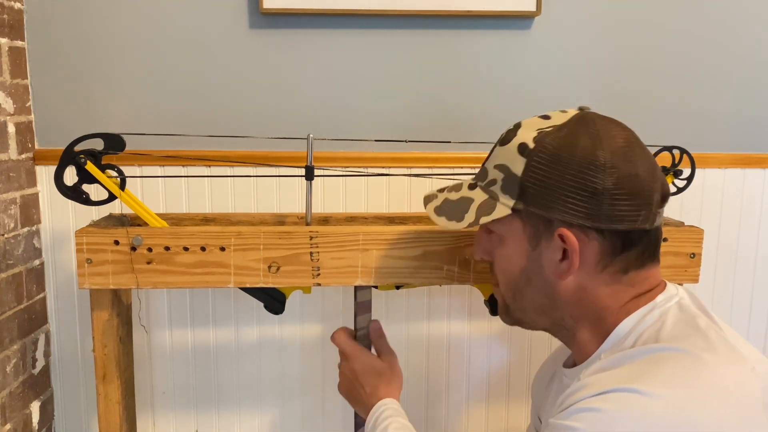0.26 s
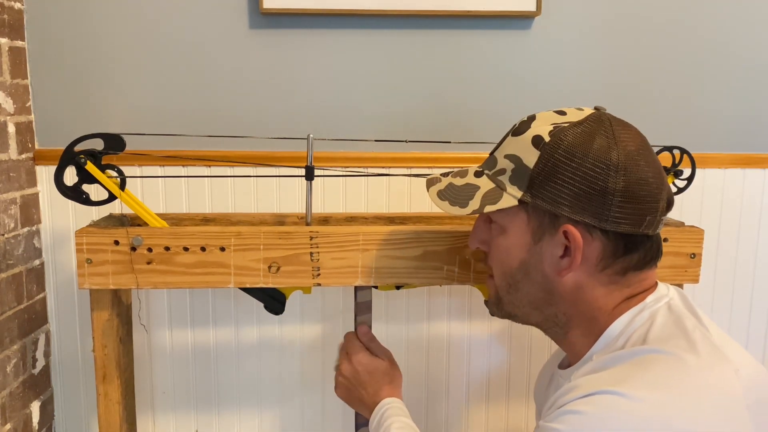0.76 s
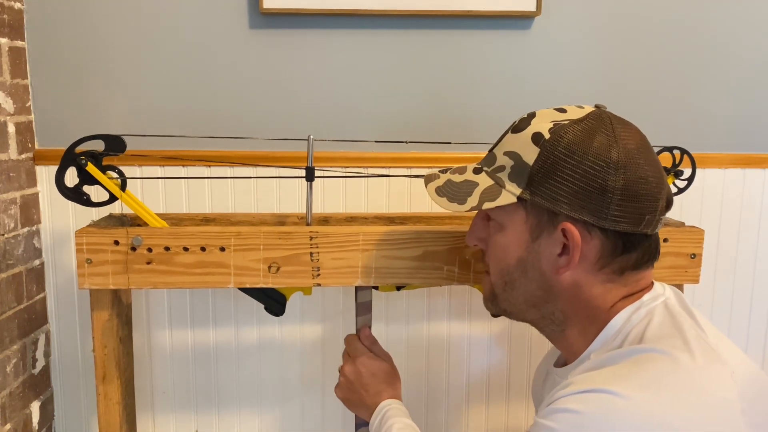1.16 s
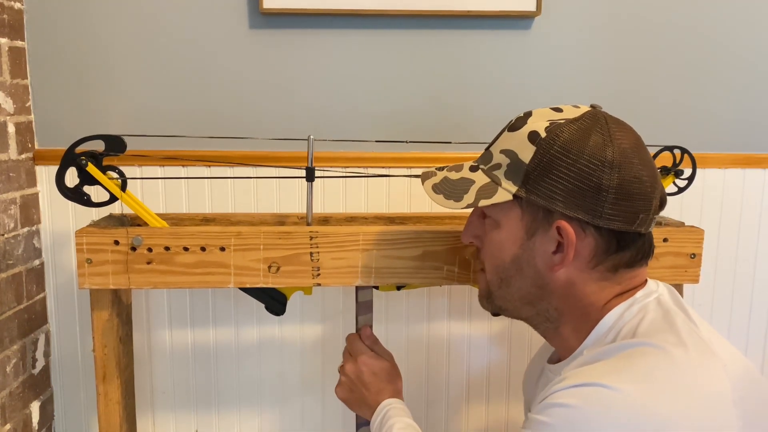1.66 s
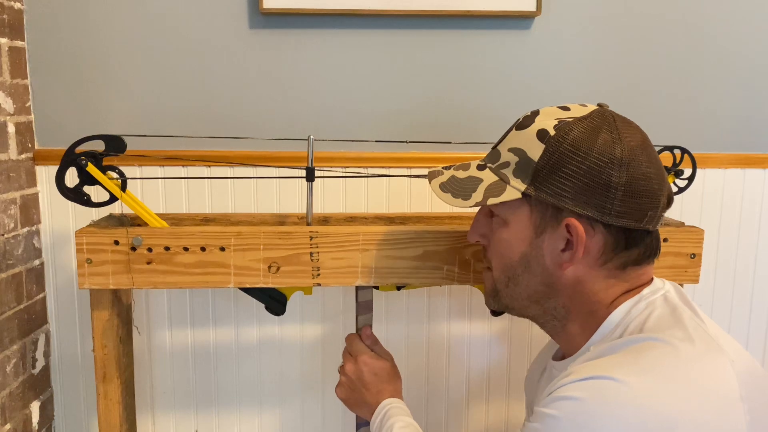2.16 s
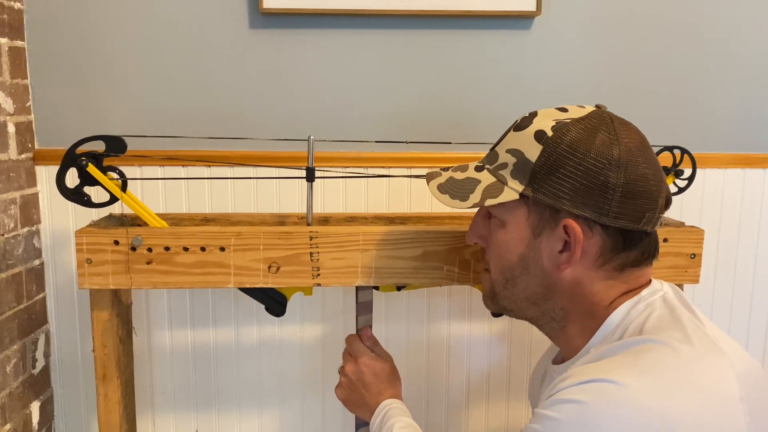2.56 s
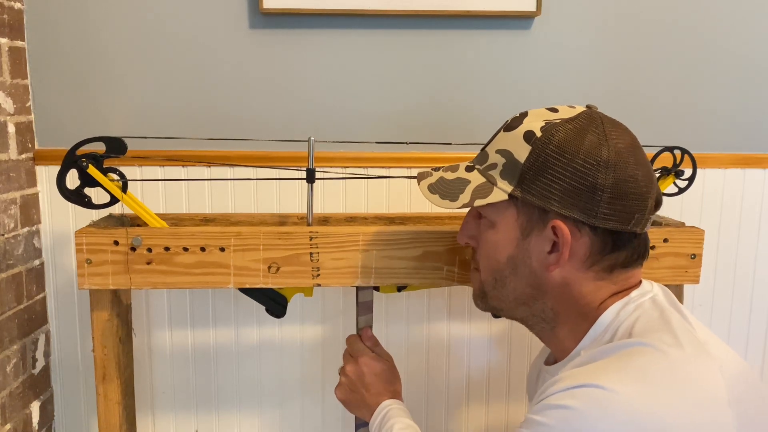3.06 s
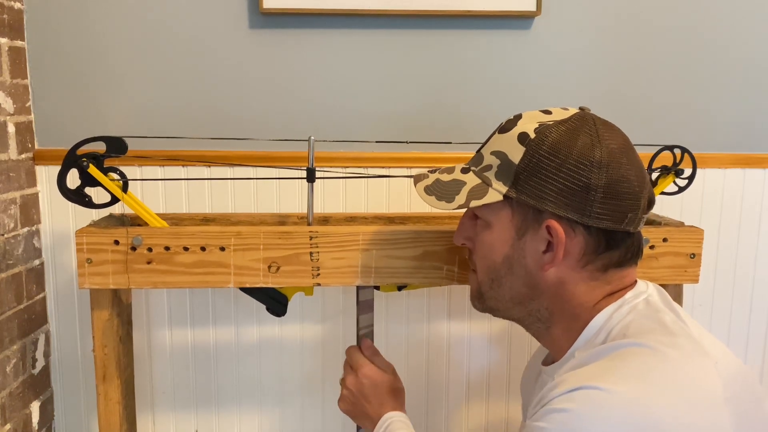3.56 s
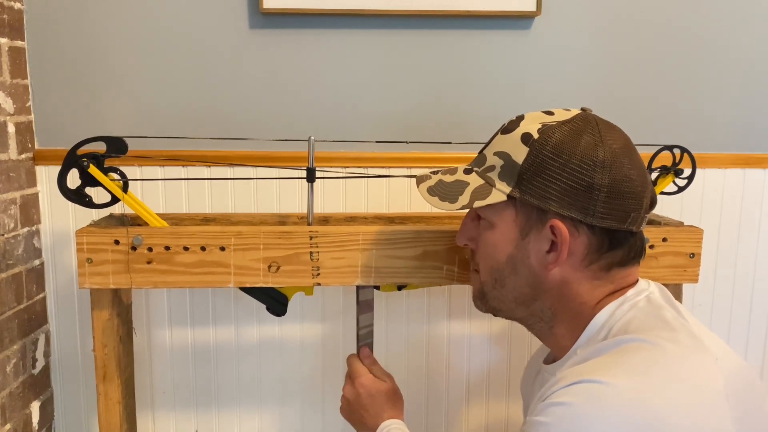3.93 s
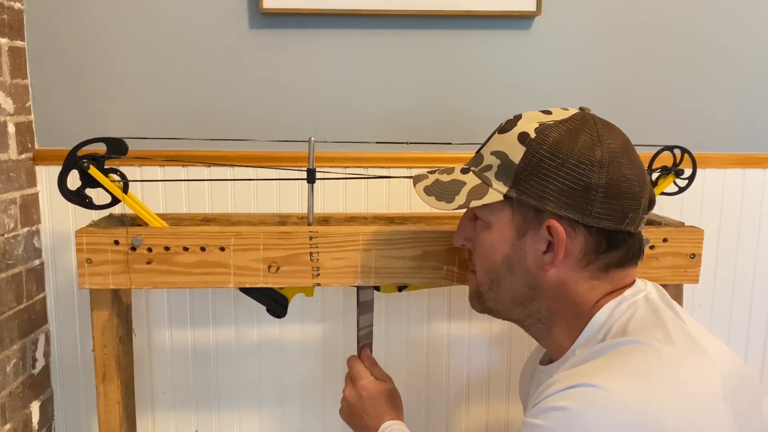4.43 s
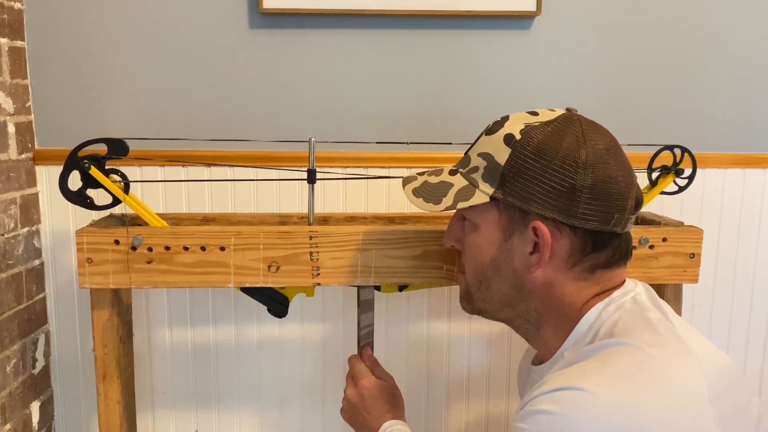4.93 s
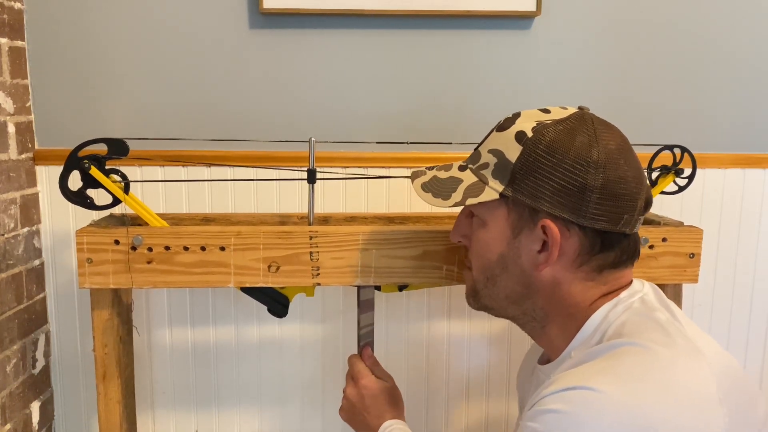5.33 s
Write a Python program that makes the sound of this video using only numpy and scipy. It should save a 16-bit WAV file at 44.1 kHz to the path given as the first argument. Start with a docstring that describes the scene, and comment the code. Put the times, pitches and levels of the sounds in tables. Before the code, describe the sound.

A ratchet strap is slowly tightened under a wooden bench in a bare room. After a soft rustle and a few faint ticks, the steel catch snaps out sharp clicks in uneven bunches. Between them the axle gives brief high squeaks, and the loaded wood groans and knocks dully. The stereo microphone hears it near the centre, with a short echo and a faint low rumble.

```python
"""Tightening a ratchet strap

A strap is cranked tight under a wooden bench in a bare room. The pawl, a small steel catch, snaps over
the teeth and knocks the beam. The axle sticks and slips, which makes it squeak. The loaded wood groans
and thuds, and the strap rustles and twangs. A two-channel microphone hears it all over a low rumble."""
import sys
import numpy as np
from scipy import signal
from scipy.fft import rfft, irfft, next_fast_len
from scipy.io import wavfile
from scipy.ndimage import map_coordinates

SR = 44100
rng = np.random.default_rng(int(sys.argv[2]) if len(sys.argv) > 2 else 0)


def generate_wav(sig):
    """Save sig (samples, or channels by samples) to the path in sys.argv[1] as 16-bit PCM at SR."""
    pcm = np.round(np.clip(np.atleast_2d(sig).T, -1, 1) * 32767).astype(np.int16)
    wavfile.write(sys.argv[1], SR, pcm)


N = 246519

# Pawl and handle hits (time [s], level [dB], extra beam [dB], extra handle [dB], extra treble [dB],
# rattle length [ms])
HITS = [(0.1264, -63, 8, 8.5, -5, 6.6), (0.4274, -43.5, -11, -9, -9.5, 6.2),
        (0.5752, -65, -14, 1.5, -13, 3.2), (0.8485, -55, -4, -1, -4, 4.1),
        (0.8751, -36, 2.5, -4.5, -14, 3.5), (0.9594, -57, 9, 3, -16, 7.4), (1.005, -67.5, 22, -3, -9, 3.96),
        (1.172, -23.5, -12, -5.5, -8.5, 4.4), (1.1804, -27.5, -6.5, -0.5, -9, 3.9),
        (1.3884, -26.5, -13, -15.5, -5, 5.5), (1.5406, -36.5, -8, -6, -13, 4.06),
        (1.8524, -54, -1.5, 6, -8, 2.6), (1.937, -9, -24, -14, -3.5, 2.66),
        (2.1294, -44.5, -3, -6, -11, 4.1), (2.368, -59, 0, -6, -12.5, 3.5),
        (2.7927, -50, -6.5, -3.5, -19, 3.4), (2.8718, -21, -13, -7, -11, 7.5),
        (3.2025, -32.5, -32.5, -24.5, -8.5, 14), (3.2201, -34, -10.5, -11, -13, 5.4),
        (3.4773, -55.5, 11.5, 0, -3.5, 5.5), (3.628, -51.5, 9, -3, -16, 10),
        (3.665, -9.5, -16.5, -16, -5.5, 3.4), (3.8359, -32, -16, -11, -11.5, 3.5),
        (3.8732, -37, -9.5, -15.5, -17.5, 4.4), (3.9073, -48.5, 1.5, -2.5, -1, 5.5),
        (4.2194, -48.5, -6, -11, -22, 5.1), (4.4597, -62, 6, 3.5, -9.5, 3.6),
        (4.6099, -27.5, -10, -11, -2, 4.1), (4.6201, -21.5, -11.5, 0, -11.5, 7.9),
        (4.923, -34.5, -11.5, -8, -4, 5.3), (4.97, -41.5, -2, -5, -7.5, 4.2),
        (5.1498, -56, 14, 0.5, -11, 5.6), (5.1902, -14, -14, -10.5, -7.5, 4.3),
        (5.3958, -39.5, -6.5, -8.5, -16, 4.4)]
# The pawl climbing a tooth just before it drops (time [s], level [dB], rattle length [ms])
CLIMBS = [(1.381, -29, 7.3), (1.93, -40, 7.5), (3.647, -36, 8.6), (3.6629, -29, 1.2), (5.1852, -35.5, 4.6)]
# A climb hardly moves the wood (extra beam [dB], extra handle [dB], extra treble [dB])
CLIMB_EXTRAS = (-27, -8, -8.5)
# The notes each part rings at (pitch [Hz], width [Hz], level [dB])
PAWL_NOTES = [(4870, 1290, -2.5), (6430, 1400, -2), (8180, 940, -3.5)]
PAWL_HIGH_NOTES = [(10420, 1000, 5.5), (11830, 750, 5), (14540, 2200, 2.5)]
HANDLE_NOTES = [(2189, 1200, -2.5), (3960, 1600, 2)]
FRAME_NOTES = [(758, 235, -5.5), (1153, 230, -2), (1430, 274, -6.5)]
BEAM_NOTES = [(124, 19, 2), (242, 63.4, -1.5), (356.7, 49.5, 2.5), (519, 130, -7)]
# How a hit shakes those five, in that order (boost [dB], length [times the rattle length])
PART_SHAKES = [(14.4, 1.2), (22.15, 1.8), (17.5, 1.2), (15.7, 2.5), (24.52, 4.5)]
# How much of the extra levels the ratchet's frame takes on (beam [share], handle [share])
FRAME_FOLLOWS = (0.58, .35)

# Below, a rise or fall is the time the level takes to change by 20 dB.
# Axle squeaks (time [s], level [dB], pitch [Hz], overtones [dB], rise [s], fall [s])
AXLE_SQUEAKS = [(0.432, -50.5, 7860, -10, .012, .02), (1.391, -39, 6630, 4, .009, .018),
                (1.755, -61.5, 5090, -26, .06, 0.039), (1.775, -36.5, 4950, -25.5, .008, 0.023),
                (1.785, -27, 4767, -22, .015, 0.0095), (1.815, -38, 4777, -21, .03, 0.039),
                (1.837, -40, 4805, -22.5, .03, .025), (3.212, -31.5, 6996, -8, 0.0075, 0.013),
                (3.226, -43.5, 6760, -18.5, .02, 0.04), (4.917, -34.5, 5130, -36, 0.0065, .02),
                (4.926, -20, 5104, -31, 0.011, 0.0097)]
# A squeak's overtones (pitch [times the main pitch], level [dB])
SQUEAK_OVERTONES = [(2, 4), (3, -2)]
# Groans of the loaded wood (time [s], level [dB], rise [s], fall [s], pitch [Hz])
WOOD_GROANS = [(0.44, -43, .1, 0.064, 150.4), (1.59, -46, .03, 0.065, 144.4),
               (1.66, -44.5, .2, 0.063, 145.5), (1.75, -40, .03, 0.019, 147.4),
               (2.09, -51.5, .02, 0.048, 150.2), (2.137, -47.5, .025, 0.099, 198.8),
               (3.435, -50.5, .04, 0.044, 189.9), (3.53, -32, .06, .03, 190.9), (3.565, -46, .05, .06, 185),
               (3.66, -37.5, .05, 0.019, 137.5), (3.806, -45.5, .15, 0.055, 169.2),
               (3.862, -44.5, .05, .1, 196.8), (4.944, -39.5, .03, .04, 166.8), (5.011, -39, .04, .15, 188),
               (5.199, -32, .085, 0.029, 210.4), (5.32, -47, .03, 0.037, 166.6),
               (5.38, -45.5, .05, 0.14, 198.2)]
# Dull knocks of the bench (time [s], level [dB], pitch [Hz], time to fade by 60 dB [s])
BENCH_KNOCKS = [(0.882, -42, 349, 0.25), (1, -34, 167, 0.12), (1.18, -25, 219, 0.075),
                (1.402, -31, 393, 0.054), (1.548, -27, 147, 0.12), (1.754, -29, 156.3, 0.21),
                (1.842, -33.5, 160, 0.17), (1.945, -31.5, 356, 0.23), (2.227, -22.5, 142, 0.092),
                (3.669, -19, 407, 0.1), (3.71, -28, 219.6, 0.134), (4.247, -30, 92.4, 0.08),
                (4.63, -32, 131.5, 0.15), (5.207, -24, 220, 0.2), (5.377, -33.5, 229, 0.13)]
# Rubs of strap and sleeve (time [s], hiss level [dB], rise [s], fall [s], scrape above hiss [dB])
STRAP_RUBS = [(0.0, -69, .1, 0.62, 10), (0.25, -81.5, .3, 0.44, 23), (0.418, -51.5, .045, 0.022, 0),
              (0.6, -80.5, .2, 0.31, 15.5), (0.763, -60.5, .06, 0.082, 5), (0.9, -64, .02, 0.024, 14.5),
              (0.974, -61, .025, 0.054, -2), (1.6, -72.5, .02, 0.096, 3.5), (1.76, -69.5, .03, 0.4, 3.5),
              (1.852, -55.5, .01, .04, -5), (3.302, -67, .02, 0.058, 6.5), (3.383, -73.5, .1, .3, 2.5),
              (3.508, -67, .12, .1, 10), (3.96, -78, .03, 0.12, -17.5), (4.259, -82, .03, 0.18, 9),
              (4.464, -75, .04, 0.096, 19), (5.002, -62.5, .02, .05, 8.5), (5.17, -59.5, .08, 0.017, 8),
              (5.435, -67.5, .02, 0.072, -14)]
# The path of the strap's twang (time [s], pitch [Hz], level [dB])
TWANG_PATH = [(1.2, 1093, -38.5), (1.236, 1073, -45), (1.25, 1153, -62), (1.29, 1171, -52),
              (1.3, 1177, -55), (1.404, 1181, -58.5), (1.42, 1190, -72)]
# The bench shaking the floor (time [s], level [dB], rise [s], fall [s])
FLOOR_SHAKES = [(1.46, -44.5, 0.042, 0.15), (1.62, -44, 0.12, .1), (1.8, -46, 0.097, 0.56),
                (2.19, -51.5, .09, 0.13), (3.47, -45.5, 0.075, .5), (3.71, -38.5, 0.13, 0.22),
                (4.66, -51, 0.13, 0.15), (5.04, -42, 0.14, .4), (5.45, -49.5, 0.12, 0.17),
                (1.2, -53, .6, 0.25)]
# The tone colour of each noise (frequency [Hz], relative level [dB])
HISS_COLOUR = [(1200, -52.5), (2200, -10), (4500, 4.5), (7500, -3.5), (11000, -3), (16000, -63.5)]
SCRAPE_COLOUR = [(150, -1), (350, -1.5), (800, -3), (1200, -12.5), (1750, -5.5), (2600, -18), (5000, -33.5)]
RUMBLE_COLOUR = [(50, -40.5), (90, -5), (240, -3), (500, -13.5), (1000, -21), (2000, -35.5), (4000, -41),
                 (8000, -53), (12000, -65.5)]
DRONE_COLOUR = [(20, -40.5), (40, -30.5), (52, 8.5), (61, 12.5), (72, 3), (95, 7.5), (140, -49)]

# How long the room echoes (frequency [Hz], time to fade by 60 dB [s])
ECHO_TIMES = [(100, 0.41), (400, 0.41), (1500, 0.47), (4000, 0.34), (8000, 0.31), (15000, 0.2)]
# How alike the room sounds on the left and right (frequency [Hz], likeness [0 to 1])
LIKENESS = [(60, .98), (250, .7), (700, .1), (2000, .3), (5000, .2), (6500, .55), (7500, .98), (16000, .98)]
# How far the left channel runs ahead of the right (frequency [Hz], phase [radians])
LEFT_LEAD = [(20, 0), (1200, .7), (2800, .5), (6100, .5), (7150, 0), (9000, -np.pi), (11300, -2 * np.pi),
             (13250, -3 * np.pi), (15500, -4 * np.pi)]
# How much louder the left channel is (frequency [Hz], level [dB])
LEFT_BOOST = [(60, .4), (380, -.5), (950, 1.8), (2400, 1.8), (5500, 3), (7500, .3), (15000, 0)]


def ratchet_clicks():
    """Each hit is a short rattle that rings steel and wood. Gives the direct and the wall-bound sound."""
    blow_db, spread_db = -5, -11  # the walls get each hit both as one blow and as a rattle
    t = np.arange(SR // 8) / SR
    parts = [PAWL_NOTES, PAWL_HIGH_NOTES, HANDLE_NOTES, FRAME_NOTES, BEAM_NOTES]
    forces = np.zeros((2, len(parts), N + len(t)))
    direct, to_walls = forces
    boost_db, stretch = np.transpose(PART_SHAKES)[..., None]
    climbs = [(s, db, *CLIMB_EXTRAS, ms) for s, db, ms in CLIMBS]
    for s, db, beam_db, handle_db, treble_db, ms in list(HITS) + climbs:
        start = round(s * SR)
        length_s = ms / 1000 * stretch
        shape = np.exp(-(t / length_s) ** 2) * (1 - np.exp(-t / (0.34 * length_s)))
        rattle = rng.standard_normal(shape.shape) * shape
        rattle /= np.linalg.norm(rattle, axis=1, keepdims=True)
        frame_db = np.dot(FRAME_FOLLOWS, [beam_db, handle_db])
        gains = amp(db + boost_db + np.vstack([0, treble_db, handle_db, frame_db, beam_db]))
        direct[:, start:start + len(t)] += gains * rattle
        # Fainter hits lie deeper under the bench, so more of their sound comes by the walls.
        wall_gains = gains * amp(-0.0888 * db)
        strongest = start + abs(rattle).argmax(axis=1)
        to_walls[np.arange(len(parts)), strongest] += amp(blow_db) * wall_gains[:, 0]
        to_walls[:, start:start + len(t)] += amp(spread_db) * wall_gains * rattle
    return filtered(forces[..., :N], lambda hz: np.array([ringing(p, hz) for p in parts])).sum(1)


def axle_squeaks():
    """The axle sticks and slips, making shaky whistles that slide from one pitch to the next."""
    s, db, hz, overtone_db, rise_s, fall_s = np.transpose(AXLE_SQUEAKS)
    lingering = swells(s, db - 25, rise_s, fall_s=0.074)  # a faint whistle outlasts each squeak
    levels = np.maximum(swells(s, db, rise_s, fall_s), lingering)
    shares = levels ** 2 / (levels ** 2).sum(0)
    phase = phase_of(per_sample(hz @ shares) * (1 + .012 * wobble(300)))
    overtones = sum(amp(level) * np.sin(k * phase) for k, level in SQUEAK_OVERTONES)
    tone = np.sin(phase) + amp(per_sample(overtone_db @ shares)) * overtones
    return per_sample(levels.max(0)) * amp(3 * wobble(150)) * tone


def wood_groans():
    """Wood fibres slip at an uneven rate, making a rough low tone and ringing the beam."""
    glide_per_db = .004  # the pitch climbs by this share as the load grows
    s, db, rise_s, fall_s, hz = np.transpose(WOOD_GROANS)
    loads = swells(s, db, rise_s, fall_s)
    from_peak_db = np.maximum(20 * np.log10(loads) - db[:, None], -30)
    pitches = hz[:, None] * (1 + glide_per_db * from_peak_db)
    pitch = (loads ** 2 * pitches).sum(0) / (loads ** 2).sum(0)  # the strongest groan counts most
    phase = phase_of(per_sample(pitch) * (1 + 0.066 * wobble(60)))
    slips = np.exp(3 * np.cos(phase)) * rng.standard_normal(N)  # one burst of noise per cycle
    beam = unit_level(filtered(slips, lambda hz: ringing(BEAM_NOTES, hz)))
    tone = np.sin(phase) + 0.2 * np.sin(2 * phase) + 0.24 * beam
    return per_sample(loads.max(0)) * amp(4 * wobble(40)) * tone


def bench_knocks():
    """Each soft blow leaves one low note of the bench ringing."""
    out, t = np.zeros(N + SR), np.arange(SR // 2) / SR
    soft_start = 1 - np.exp(-t / 0.0074)
    for s, db, hz, fade_s in BENCH_KNOCKS:
        level = amp(db - 60 * t / fade_s) * soft_start
        out[round(s * SR):][:len(t)] += level * np.sin(2 * np.pi * hz * t)
    return out[:N]


def strap_rustle():
    """Strap and sleeve rub in clumps of tiny grains: a bright hiss and a duller scrape."""
    clumps = amp(2.5 * wobble(30) + 3 * wobble(400))
    hiss = coloured(clumps * rng.standard_normal(N), HISS_COLOUR)
    scrape = coloured(clumps * rng.standard_normal(N), SCRAPE_COLOUR)
    s, db, rise_s, fall_s, scrape_db = np.transpose(STRAP_RUBS)
    hiss_level = swells(s, db, rise_s, fall_s).max(0)
    scrape_level = swells(s, db + scrape_db, rise_s, fall_s).max(0)
    return per_sample(hiss_level) * hiss + per_sample(scrape_level) * scrape


def strap_twang():
    """After one blow the strap rings with a thin, wavering tone."""
    s, hz, db = np.transpose(TWANG_PATH)
    span = slice(round(s[0] * SR), round(s[-1] * SR))
    t = np.arange(N)[span] / SR
    soft_edges = np.clip(np.minimum(t - s[0], s[-1] - t) / 0.007, 0, 1)
    level = amp(np.interp(t, s, db) + 0.77 * wobble(45, size=len(t)))
    out = np.zeros(N)
    out[span] = soft_edges * level * np.sin(phase_of(np.interp(t, s, hz)))
    return out


def room_echo(x):
    """The bare walls return two unrelated echoes, made anew every third of a second as the sources shift."""
    block = SR // 3
    starts = range(0, N, block)
    hz, t, noise = signal.stft(rng.standard_normal((len(starts), 2, SR // 2)), SR, nperseg=256)
    fade = amp(-60 * t / value_at(ECHO_TIMES, hz)[:, None])
    tails = signal.istft(noise * fade, SR, nperseg=256)[1]
    tails *= 1 - np.exp(-np.arange(tails.shape[-1]) / (0.0016 * SR))  # the first echoes take a moment
    out = np.zeros((2, N + 2 * SR))
    for start, tail in zip(starts, tails):
        echo = signal.fftconvolve(x[None, start:start + block], tail / np.linalg.norm(tail[0]), axes=1)
        out[:, start:start + echo.shape[1]] += echo
    return out[:, :N]


def house_rumble():
    """Two unrelated faint rumbles, plus a low drone that swells as the bench shakes the floor."""
    rumble_db, drone_db = -60, -57
    rumble = amp(rumble_db + 2.5 * wobble(3.15)) * coloured(rng.standard_normal((2, N)), RUMBLE_COLOUR)
    shakes = swells(*np.transpose(FLOOR_SHAKES))
    drone_level = np.sqrt(amp(drone_db) ** 2 + (shakes ** 2).sum(0))  # powers add
    rumble[0] += per_sample(drone_level) * coloured(rng.standard_normal(N), DRONE_COLOUR)
    return rumble


def amp(db):
    """Turn decibels into a number to multiply by."""
    return 10 ** (np.asarray(db) / 20)


def unit_level(x):
    """Scale a sound to an average power of 1."""
    return x / np.sqrt(np.mean(x ** 2) + 1e-20)


def phase_of(hz):
    """How far a tone of changing pitch has turned, in radians."""
    return 2 * np.pi * np.cumsum(hz) / SR


def value_at(table, hz):
    """Read between the rows of a (frequency, value) table, on a log frequency scale."""
    row_hz, values = np.transpose(table)
    return np.interp(np.log(hz + 1), np.log(row_hz + 1), values)


def wobble(rate, size=N):
    """A smooth curve through `rate` random points a second."""
    points = rng.standard_normal(int(size * rate / SR) + 4)
    return map_coordinates(points, [np.arange(size) * rate / SR], order=2)


def swells(s, db, rise_s, fall_s):
    """Each event's strength per millisecond: a straight climb in dB to its peak, then a straight fall."""
    s, db, rise_s, fall_s = (np.reshape(column, (-1, 1)) for column in (s, db, rise_s, fall_s))
    since_peak = np.arange(N * 1000 // SR + 2) / 1000 - s
    drop_db = 20 * np.maximum(-since_peak / rise_s, since_peak / fall_s)
    return amp(db - np.minimum(drop_db, 100))


def per_sample(per_ms):
    """Fill in a curve from one value a millisecond to one a sample."""
    return np.interp(np.arange(N) * 1000 / SR, np.arange(len(per_ms)), per_ms)


def filtered(x, response):
    """Change the strength and phase of each frequency in x by response(hz)."""
    n = x.shape[-1]
    padded = next_fast_len(n + 8192)
    return irfft(rfft(x, padded) * response(np.fft.rfftfreq(padded, 1 / SR)), padded)[..., :n]


def ringing(notes, hz):
    """How a part that rings at these notes answers each frequency, scaled to an energy of 1."""
    response = sum((-1) ** k * amp(db) * 1j * hz * width / (pitch ** 2 - hz ** 2 + 1j * hz * width)
                   for k, (pitch, width, db) in enumerate(notes))
    return response / np.sqrt(np.mean(abs(response) ** 2))


def coloured(noise, colour):
    """Give noise a tone colour and an average power of 1."""
    return unit_level(filtered(noise, lambda hz: amp(value_at(colour, hz))))


def scene():
    """The direct sound sits in the middle; echo and rumble spread to the left and right."""
    clicks, clicks_to_walls = ratchet_clicks()
    axle_and_strap = axle_squeaks() + strap_rustle() + strap_twang()
    wood = wood_groans() + bench_knocks()
    to_walls = clicks_to_walls + amp(-6) * axle_and_strap + amp(-10.5) * wood
    room = amp(2) * room_echo(to_walls) + house_rumble()

    def middle_and_side(hz):
        """The more alike left and right are, the less goes to the side."""
        angle = np.arccos(value_at(LIKENESS, hz)) / 2
        return np.array([np.cos(angle), np.sin(angle)])

    middle, side = filtered(room, middle_and_side)
    direct = clicks + axle_and_strap + wood
    return np.array([direct + middle + side, direct + middle - side])


def record(dry):
    """The microphone's two channels differ in level and phase, and the highest treble is cut off."""
    cut_start_hz, cut_width_hz = 15400, 1400
    half = np.array([[.5], [-.5]])  # left and right each take half, in opposite directions

    def microphone(hz):
        balance = amp(half * value_at(LEFT_BOOST, hz))
        lead = np.exp(1j * half * value_at(LEFT_LEAD, hz))
        treble_cut = amp(-90 * np.clip((hz - cut_start_hz) / cut_width_hz, 0, 1) ** 2)
        return balance * lead * treble_cut

    return filtered(dry, microphone)


dry = scene()
out = record(dry)
generate_wav(out)
```